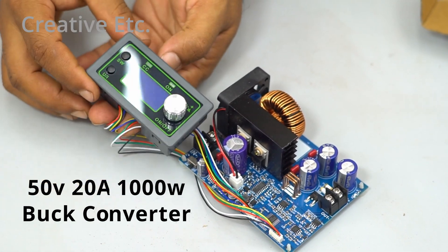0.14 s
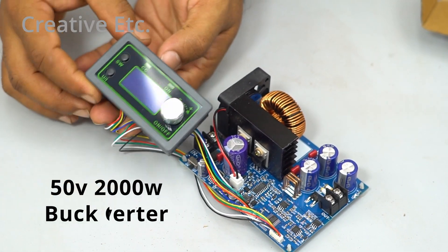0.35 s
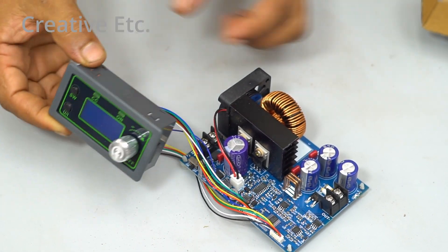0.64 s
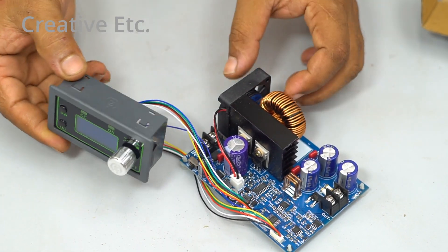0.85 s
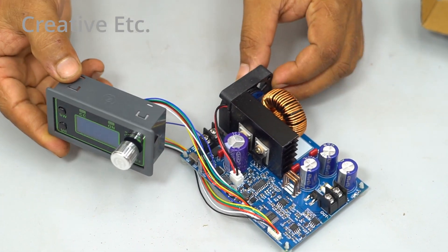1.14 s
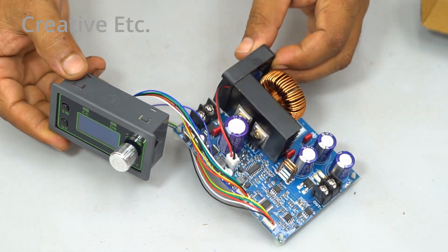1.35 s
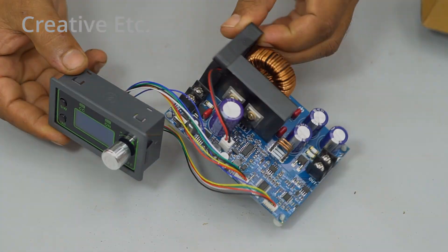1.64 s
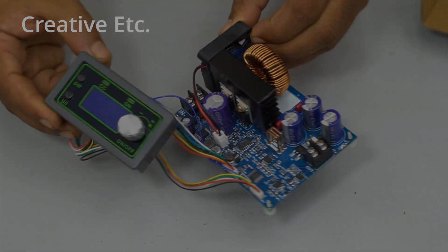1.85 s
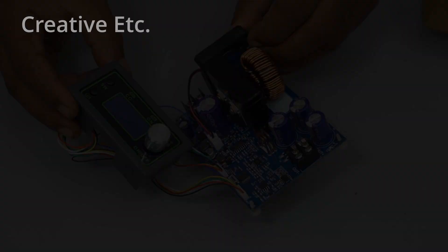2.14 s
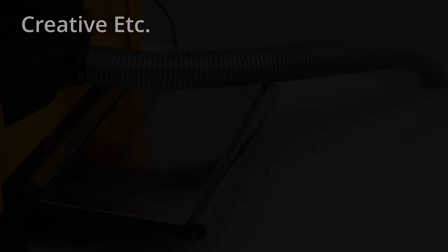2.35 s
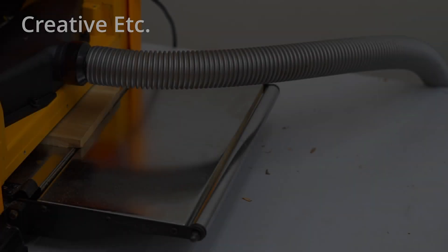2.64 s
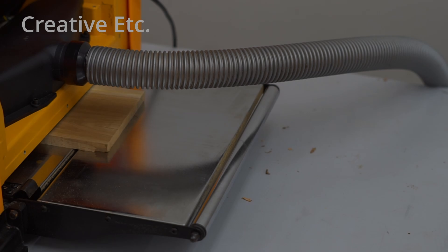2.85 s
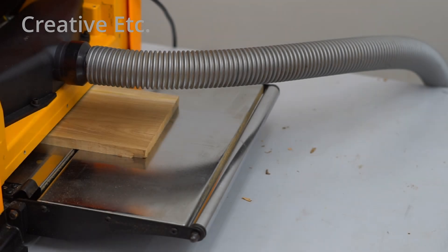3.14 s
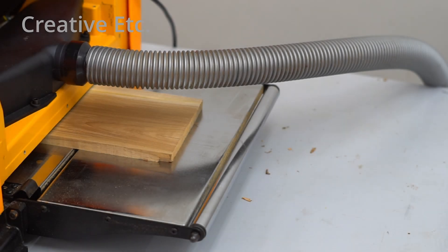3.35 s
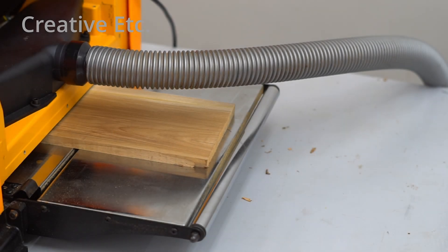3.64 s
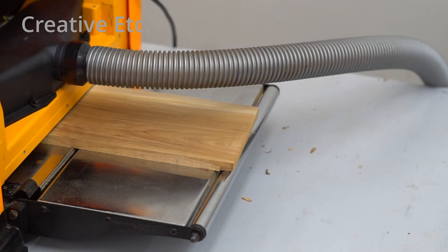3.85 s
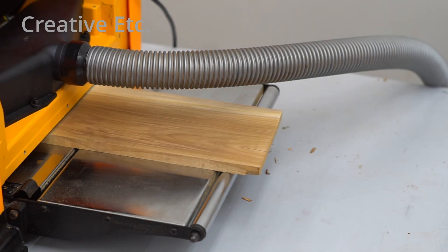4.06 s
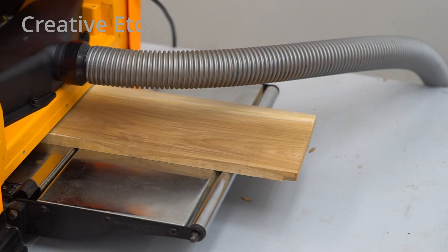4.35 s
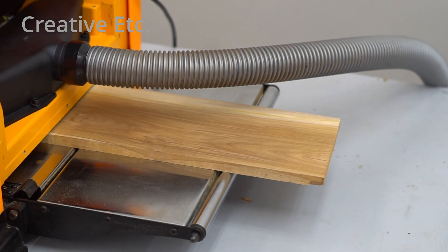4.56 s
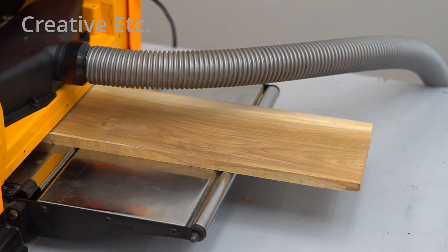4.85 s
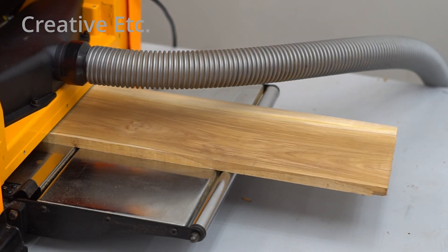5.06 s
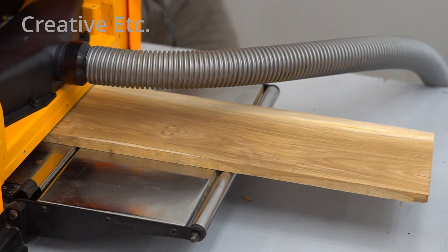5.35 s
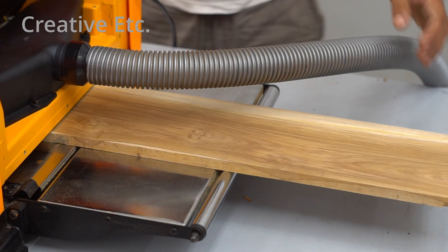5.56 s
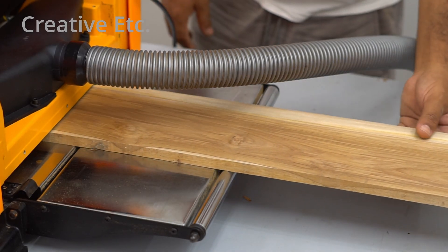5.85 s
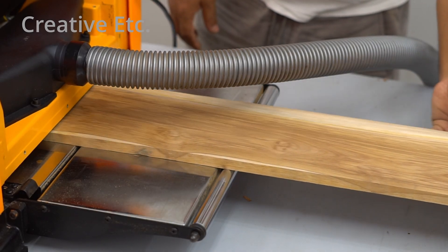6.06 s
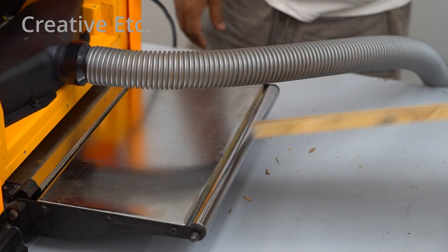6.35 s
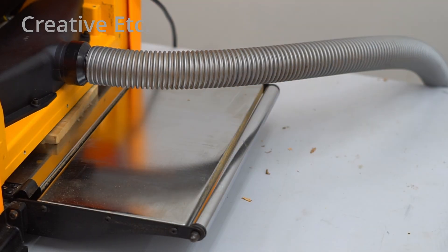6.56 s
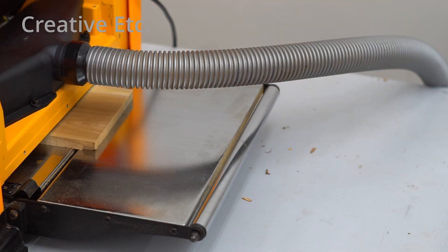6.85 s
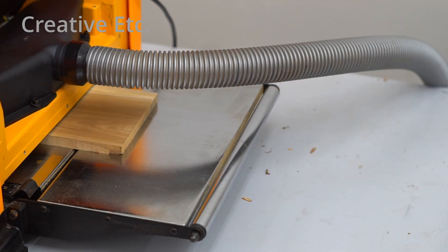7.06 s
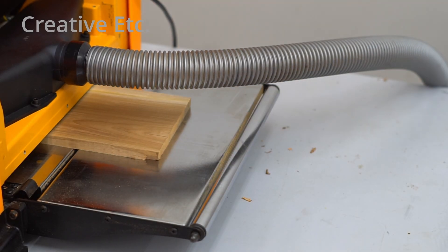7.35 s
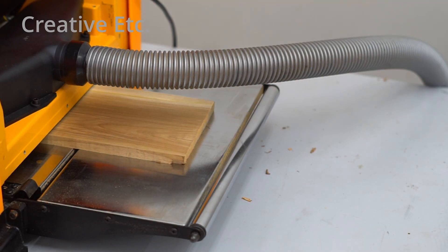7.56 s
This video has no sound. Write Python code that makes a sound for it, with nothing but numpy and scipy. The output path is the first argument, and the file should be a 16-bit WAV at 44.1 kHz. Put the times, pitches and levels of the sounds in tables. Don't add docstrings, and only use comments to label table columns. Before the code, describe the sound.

Quiet night air with shrill insects and faint finger ticks, then abruptly a loud planer howls through a board, whines freely, and bites again.

```python
import sys
import numpy as np
from scipy import signal
from scipy.fft import rfft, irfft, next_fast_len
from scipy.io import wavfile

SR = 44100
rng = np.random.default_rng(int(sys.argv[2]) if len(sys.argv) > 2 else 0)


def volts_from_db(level):
    exponent = np.asarray(level, float) / 20
    return 10 ** exponent


def unload_audio(sound):
    columns = np.transpose(np.atleast_2d(sound))
    steps = np.round(np.clip(columns, -1, 1) * 32767)
    wavfile.write(sys.argv[1], SR, steps.astype(np.int16))


N = 340452
MOTOR_PER_HEAD = 2.483

# board enters in seconds, board leaves in seconds.
PASSES = [
    (2.322, 5.71),
    (6.438, 7.8),
]
# time in seconds, roar level in dB, whine level in dB.
FREE = [
    (5.72, -29.5, -48),
    (5.81, -29.5, -40),
    (6.0, -28, -39),
    (6.2, -26.5, -35),
    (6.43, -24.5, -36),
]


def at_hz(points, hz):
    point_hz, db = np.transpose(points)
    return np.interp(np.log(hz), np.log(point_hz), db)


def in_time(rows, fade=0.0054):
    s, *columns = np.transpose(rows)
    t = np.arange(N) / SR
    gate = np.interp(t, [s[0] - fade, s[0], s[-1], s[-1] + fade], [0, 1, 1, 0])
    return [np.interp(t, s, c) for c in columns] + [gate]


def rms_one(x):
    return x / np.sqrt(np.mean(x ** 2) + 1e-20)


def drift(rate, count=1):
    r = np.exp(-128 * np.pi * rate / SR)
    noise = rng.standard_normal((count, N // 64 + 1002))
    slow = signal.lfilter([1], [1, -2 * r, r * r], noise)[:, 1000:]
    return slow / slow.std(axis=1, keepdims=True)


def fine(slow):
    return np.interp(np.arange(N) / 64, np.arange(len(slow)), slow)


def bumps(rows):
    t = np.arange(N) / SR
    return sum(db * np.exp(-((t - s) / length) ** 2) for s, length, db in rows)


def peaks(modes, hz, steep=2):
    power = 0
    for centre_hz, width_hz, db in modes:
        off_centre = 2 * (hz - centre_hz) / width_hz
        power = power + volts_from_db(db) ** 2 / (1 + off_centre ** 2) ** steep
    return np.sqrt(power)


def coloured(gain, source=None, alike_hz=3000, closest=1):
    size = next_fast_len(N)
    hz = np.arange(size // 2 + 1) * SR / size + 1
    pulsing = 1 if source is None else source
    mid, side = rfft(rng.standard_normal((2, N)) * pulsing, size)
    alike = closest / (1 + (hz / alike_hz) ** 4)
    both = np.sqrt(1 + alike) * mid + np.sqrt(1 - alike) * side * [[1], [-1]]
    return rms_one(irfft(both * gain(hz), size)[:, :N])


def night_air():
    # frequency in Hz, density in dB per Hz.
    air_spectrum = [(15, -28), (28, -2), (55, -1.5), (100, -13.5), (175, -19), (490, -28), (1000, -36.5),
                    (2000, -38.5), (2700, -39), (4900, -39), (8500, -33), (12000, -45.5), (15600, -50),
                    (16000, -80)]
    return coloured(lambda hz: volts_from_db(at_hz(air_spectrum, hz)), alike_hz=5960, closest=0.93)


def insect_chorus():
    # centre in Hz, width in Hz, level in dB.
    wing_bands = [(3870, 310, -7), (3760, 180, -8.5), (3710, 14, 2.5), (3580, 180, -11.5),
                  (3130, 490, -26.5), (6830, 1530, -21.5), (7700, 260, -22)]
    flutter = volts_from_db(2.0 * fine(drift(56)[0]))
    return coloured(lambda hz: peaks(wing_bands, hz, steep=3), flutter, alike_hz=6750)


def far_hums():
    # start in seconds, end in seconds, frequency in Hz, level in dB.
    hum_tones = [
        (.06, 0.58, 675, -61.5),
        (0.198, 0.74, 571, -62),
        (.42, 1, 740, -66),
        (.77, .88, 517, -64),
        (1.15, 2.05, 740, -72),
        (-.5, 3, 14885, -70),
        (-.5, 2.8, 15088, -76),
        (-.5, 2.8, 53, -75),
        (-.2, 0.42, 149.3, -53.5),
    ]
    t = np.arange(N) / SR
    hums = 0
    for start, end, hz, db in hum_tones:
        along = np.clip((t - start) / (end - start), 0, 1)
        swell = np.sqrt(np.clip(np.sin(np.pi * along), 0, 1))
        hums = hums + volts_from_db(db + 1.5) * swell * np.sin(2 * np.pi * hz * t)
    return hums


def finger_ticks():
    # time in seconds, peak in dB, length in seconds.
    taps = [
        (0.452, -48, 0.011),
        (0.492, -44, 0.017),
        (1.506, -42, 0.01),
        (1.887, -52, 0.011),
        (2.0074, -50, 0.011),
    ]
    t = np.arange(N) / SR
    touch = 0
    for s, db, length in taps:
        steepness = np.where(t < s, 2.5, 1)
        touch = touch + volts_from_db(db) * np.exp(-np.abs(t - s) / length * steepness)
    return touch * coloured(lambda hz: volts_from_db(-4.0 * np.abs(np.log2(hz / 5000))), alike_hz=9000)


def wire_rustles():
    # time in seconds, peak in dB, length in seconds.
    strokes = [
        (0.047, -60.5, 0.044),
        (0.462, -57, 0.018),
        (1.269, -62, .02),
        (1.45, -59, 0.033),
        (2.01, -64, 0.0099),
    ]
    # centre in Hz, width in Hz, level in dB.
    scrape_bands = [(1590, 1200, -3), (350, 200, 1)]
    t = np.arange(N) / SR
    brush = sum(volts_from_db(db) * np.exp(-((t - s) / length) ** 2) for s, db, length in strokes)
    return brush * coloured(lambda hz: peaks(scrape_bands, hz), alike_hz=5000)


def bench():
    # time in seconds, air level in dB, insect level in dB.
    levels = [
        (0.0, -47.5, -45),
        (2.31, -51.5, -43),
    ]
    air_db, insect_db, gate = in_time(levels)
    air = volts_from_db(air_db) * night_air()
    chorus = volts_from_db(insect_db) * insect_chorus()
    return gate * (air + chorus + far_hums() + finger_ticks() + wire_rustles())


def head_hz():
    # time in seconds, head speed in turns per second (Hz).
    first_speed = [(2.32, 165.8), (3.09, 152.3), (3.85, 141.6), (4.04, 142.7), (4.41, 142), (4.75, 136.7),
                   (5.3, 146), (5.64, 160.1), (5.76, 163.6)]
    free_speed = [(5.801, 167.3), (5.95, 172.6), (6.1, 177.6), (6.28, 181.4), (6.431, 182.4)]
    second_speed = [(6.44, 165.7), (7.202, 152), (7.698, 145.4), (7.72, 143.3)]
    return in_time([*first_speed, *free_speed, *second_speed])[0]


def board(speed):
    # time in seconds, length in seconds, level in dB.
    surges = [(2.83, 0.058, 2.5), (3.62, 0.23, 3.5), (4.42, 0.24, 2), (5.18, .12, 1.5), (6.48, .04, 0),
              (6.95, 0.14, 2), (7.33, 0.058, 0.5), (7.68, .1, -1)]
    # time in seconds, length in seconds, level in dB.
    grain = [
        (3.215, 0.16, -8.5),
        (4.483, 0.13, 6),
        (5.68, 0.07, 5.5),
        (7.13, 0.047, 4),
        (7.42, 0.092, -7.5),
    ]
    # centre in Hz, width in Hz, level in dB.
    table_flap = [(295.4, 10.1, 7.3), (322.1, 9, 3.2)]
    entry_s, flare_s, release_s, punch_s = 0.005, 0.37, 0.12, 0.14
    t = np.arange(N) / SR
    enter, leave = np.transpose(PASSES)[:, (t > PASSES[1][0] - .1).astype(int)]
    gone = np.clip((t - leave) / release_s, 0, 1)
    nearing = np.clip(1 - (leave - t) / flare_s, 0, 1)
    sag_db = 0.59 * (t - enter)
    bite_db = -15.5 - 2 * nearing - sag_db - 16 * gone
    chips_db = -26.5 + bumps(surges) + 8 * nearing - 22.5 * gone
    punch_db = 11.5 * np.exp(-np.abs(t - enter) / punch_s)
    low_db = 1 + punch_db + bumps(grain)
    stroke_db = 20 * np.log10(np.hypot(peaks(table_flap, 2 * speed), volts_from_db(-4)))
    opening = np.clip((t - enter) / entry_s + 1, 0, 1)
    closing = np.clip((leave + release_s - t) / .0054 + 1, 0, 1)
    return bite_db, chips_db, low_db, stroke_db, opening * closing


def knives(speed, low_db, stroke_db):
    # centre in Hz, width in Hz, level in dB.
    body = [(293, 81, -18.5), (306, 49, -19.5), (455, 32.3, -4.5), (574.7, 63, -4.5), (704, 57, -5),
            (733, 67, -7), (903, 322, -3), (1160, 13, -6.5), (1245, 37, -1), (1356, 42, 0),
            (1778, 113, -0.7), (1929, 27, 0.5), (2026, 100, -2.5), (2250, 210, -9.5), (2484, 520, -10.5),
            (2774, 56, -6), (3043, 48, -10.5), (3030, 53, -21.5)]
    turn = 2 * np.pi * np.cumsum(speed) / SR
    orders = np.arange(2, 38)
    hz = orders[:, None] * speed[::64]
    broad_body = volts_from_db(-7.5 - 7.3 * np.abs(np.log2(hz / 1500)) ** 1.26) * (hz > 400)
    gain = np.hypot(peaks(body, hz), broad_body)
    unsteady_db = 2.5 * drift(11.3, count=36)[:, :hz.shape[1]]
    gain = gain * volts_from_db(unsteady_db + low_db[::64] * (hz < 700))
    gain[0] *= volts_from_db(stroke_db[::64])
    waver = 0.066 * drift(6.5) * orders[:, None] ** 0.67 + rng.uniform(0, 2 * np.pi, (36, 1))
    tones = [fine(g) * np.sin(k * turn + fine(w)) for k, g, w in zip(orders, gain, waver)]
    belt = 1 + 0.35 * np.sin(MOTOR_PER_HEAD * turn)
    feed_gain = peaks([(115.7, 7.9, -41)], 0.799 * speed)
    feed = feed_gain * np.sin(0.77 * turn + 2.1 * fine(drift(4.4)[0]))
    return rms_one(sum(tones[:8]) + belt * sum(tones[8:])) + feed, turn


def torn_fibres(strokes):
    # frequency in Hz, density in dB per Hz.
    tear_spectrum = [(18, -79), (30, -68), (182, -21.5), (289, -13), (364, -15), (439, -7), (640, -4),
                     (696, 1), (1360, -1.5), (2030, 7), (4500, -21), (5850, -128), (9900, -120)]
    return coloured(lambda hz: volts_from_db(at_hz(tear_spectrum, hz)), strokes, alike_hz=1740, closest=0.97)


def flying_chips(strokes):
    # frequency in Hz, density in dB per Hz.
    chip_spectrum = [(400, -80), (1470, -42), (2500, -5.5), (5270, -10), (10800, -15.5), (15100, -23.5),
                     (16000, -29)]
    impact_db = 2.26 * np.minimum(rng.exponential(1, N), 5)
    uneven_db = 0.86 * fine(drift(31)[0]) + 0.5 * fine(drift(2.7)[0])
    splinters = strokes * volts_from_db(impact_db + uneven_db)
    return coloured(lambda hz: volts_from_db(at_hz(chip_spectrum, hz)), splinters, alike_hz=2880)


def cutting(speed):
    bite_db, chips_db, low_db, stroke_db, gate = board(speed)
    tones, turn = knives(speed, low_db, stroke_db)
    strokes = 1 + .5 * np.sin(turn) + 0.8 * np.sin(2 * turn)
    bite = volts_from_db(bite_db + 5.0) * (tones + volts_from_db(-9) * torn_fibres(strokes))
    chips = volts_from_db(chips_db + 4) * flying_chips(strokes)
    return gate * (bite + chips), turn


def free_running(turn):
    # frequency in Hz, density in dB per Hz.
    roar_spectrum = [(18, -75), (30, -43), (118, -30), (265, -10.5), (404, -11), (525, -9.5), (584, -11.5),
                     (702, -19), (759, -8.5), (889, -7.5), (3140, -10.5), (10200, -23), (16000, -28)]
    # multiple of head speed, level in dB relative to the roar.
    free_tones = [(1.0, -27), (1.5, -20), (2.0, -20), (3.0, -7), (4.0, -9), (5.0, -18), (10.2, -12),
                  (11.2, -19), (13.1, -17), (16.85, -18), (23.4, -16), (29.8, -15), (49.6, -25)]
    roar_db, whine_db, gate = in_time(FREE, fade=0.023)
    unsteady = volts_from_db(3.1 * drift(9.5, count=len(free_tones)))
    shake = .028 * fine(drift(60)[0])
    tones = 0
    for (order, db), level in zip(free_tones, unsteady):
        tones = tones + volts_from_db(db) * fine(level) * np.sin(order * (turn + shake))
    roar = coloured(lambda hz: volts_from_db(at_hz(roar_spectrum, hz)), alike_hz=2000)
    whine = volts_from_db(whine_db) * np.sin(24 * MOTOR_PER_HEAD * (turn + .7 * shake))
    return gate * (volts_from_db(roar_db + 3.5) * (roar + 1.2 * tones) + whine)


def scene():
    cut, turn = cutting(head_hz())
    planer = cut + free_running(turn)
    treble = signal.lfilter(*signal.butter(1, 3000, "high", fs=SR), planer)
    return bench() + planer + .1 * treble * [[1], [-1]]


def held(rows, s):
    rows = np.array(rows)
    return rows[np.searchsorted(rows[1:, 0], s, "right"), 1]


def slipped(ears):
    # time in seconds, phase in rad.
    bass_slips = [(0.0, 1.3), (0.71, -2.4), (1.0, 2.6), (1.46, -2.8), (1.88, 1.3), (2.01, 2.6), (2.32, 0.0),
                  (2.77, 2.9), (3.01, 1.2), (3.68, 3.1), (4.46, -0.2), (4.64, 1.9), (4.89, 0.9),
                  (5.19, -0.3), (5.43, 2.0), (5.61, 0.8), (6.21, 2.6), (6.37, -0.4), (6.43, -3.1),
                  (6.88, -0.5)]
    # time in seconds, phase in rad.
    insect_slips = [(0, -2.5), (.57, -.1), (1.28, 1.2), (1.35, -.1)]
    # order, start in seconds, end in seconds, phase in rad.
    order_holds = [(3, 2.32, 2.95, -3.0), (3, 2.95, 3.26, 1.2), (3, 3.65, 4.56, 3.0), (3, 4.84, 5.24, .7),
                   (3, 5.54, 6.43, .7), (3, 6.44, 7.35, 2.5), (4, 2.32, 2.71, -.1), (4, 2.71, 3.13, 2.1),
                   (4, 3.39, 4.19, 2.7), (4, 4.19, 4.6, .1), (4, 4.6, 5.19, 2.2), (4, 5.67, 6.04, 2.2),
                   (4, 6.04, 6.56, .2), (4, 6.71, 7.15, 1.6), (4, 7.5, 7.8, -.6), (5, 2.32, 3.07, .3),
                   (5, 3.68, 4.64, -2.3), (6, 6.14, 6.8, .6), (5, 6.34, 7.16, -3.1), (6, 2.32, 2.72, .6),
                   (6, 2.88, 3.45, .7), (6, 3.7, 4.41, .9), (6, 4.78, 5.36, -1.6), (6, 7.06, 7.57, 1.5),
                   (7, 3.8, 4.68, 2.7), (9, 4.35, 4.56, 2.8), (10, 3.88, 4.56, 3.1), (5, 4.89, 5.33, -1.2),
                   (3, 3.26, 3.51, 2.4)]
    whine_holds = [(30, .8), (60, 2.0)]
    cut_in_s = 2.316
    hz, s, frames = signal.stft(ears, SR, nperseg=2048)
    orders = np.arange(120)[:, None]

    jumps = np.cumsum(rng.random((120, len(s))) < .07 + .01 * orders, axis=1)
    chance = np.take_along_axis(rng.uniform(-np.pi, np.pi, jumps.shape), jumps % len(s), axis=1)
    planer, night = chance.copy(), np.roll(chance[24:33], 7)
    planer[:3] = night[0] = held(bass_slips, s)
    for order, start, end, rad in order_holds:
        planer[order, (s > start) & (s <= end)] = rad
    night[4] = held(insect_slips, s)
    night[1], night[8] = -1.4, 1.2
    for order, rad in whine_holds:
        planer[order - 2:order + 2, (s > FREE[1][0]) & (s <= FREE[-1][0])] = rad

    step = np.abs(np.sin(np.diff(planer, axis=1, prepend=0, append=0) / 2))
    dip = 1 - 0.63 * np.maximum(step[:, 1:], step[:, :-1]) / (1 + (orders / 14.7) ** 2)
    planer += np.where(orders < 3, .12, .22) * rng.standard_normal(planer.shape)

    speed = head_hz()[np.minimum(s * SR, N - 1).astype(int)]
    order = np.minimum(np.round(hz[:, None] / speed), 119).astype(int)
    band = np.searchsorted([380, 800, 1700, 3300, 4400, 6000, 8000, 11000], hz)
    lead = np.where(s < cut_in_s, night[band], np.take_along_axis(planer, order, axis=0))
    unbroken = (s < cut_in_s + .06) | (np.abs(s - PASSES[1][0]) < .06)
    frames = frames * np.where(unbroken, 1, np.take_along_axis(dip, order, axis=0))
    turned = frames * [np.exp(.5j * lead), np.exp(-.5j * lead)]
    return signal.istft(turned, SR, nperseg=2048)[1][:, :N]


def top_cut(x):
    return signal.sosfilt(signal.butter(12, 15850, fs=SR, output="sos"), x)


def record(dry):
    wet = np.clip(slipped(dry), -1, 1)
    top = signal.cheby2(20, 30, 16250, fs=SR, output="sos")
    return top_cut(signal.sosfiltfilt(top, wet))


dry = scene()
out = record(dry)
unload_audio(out)
```